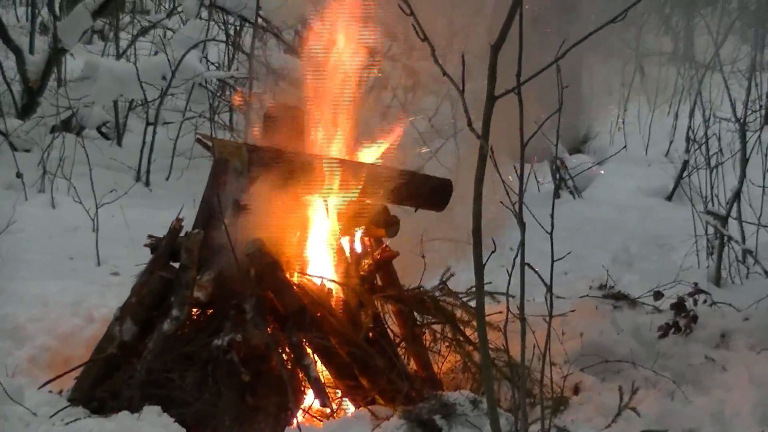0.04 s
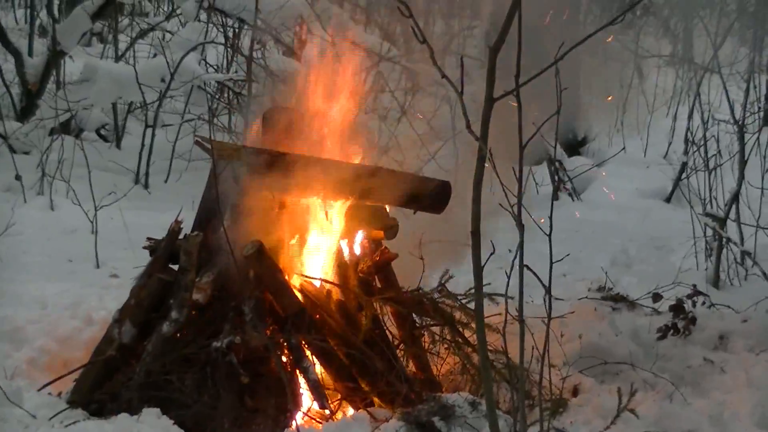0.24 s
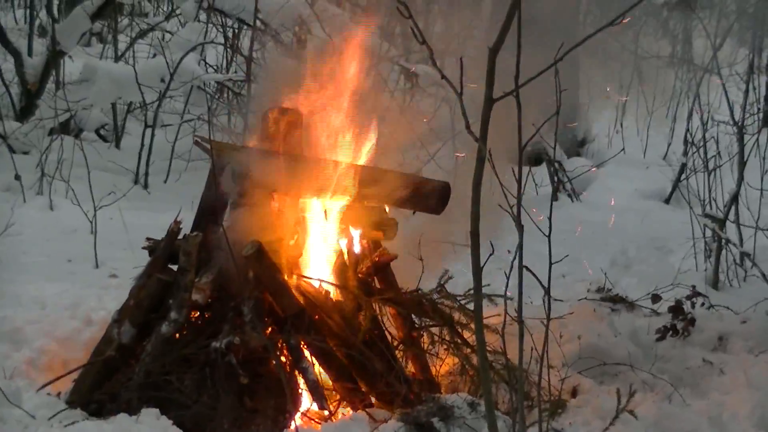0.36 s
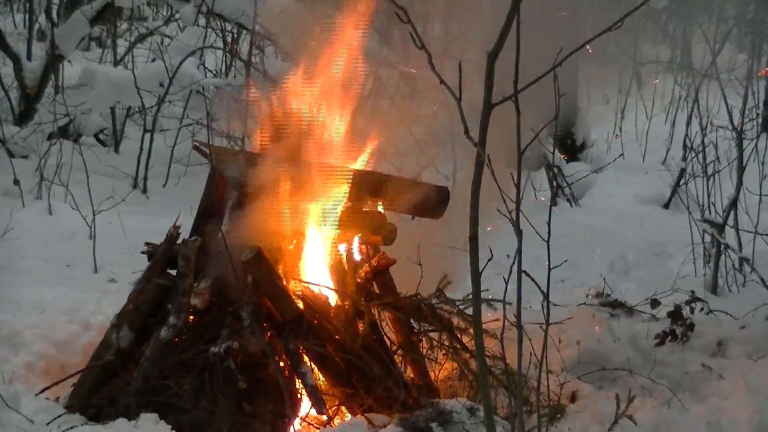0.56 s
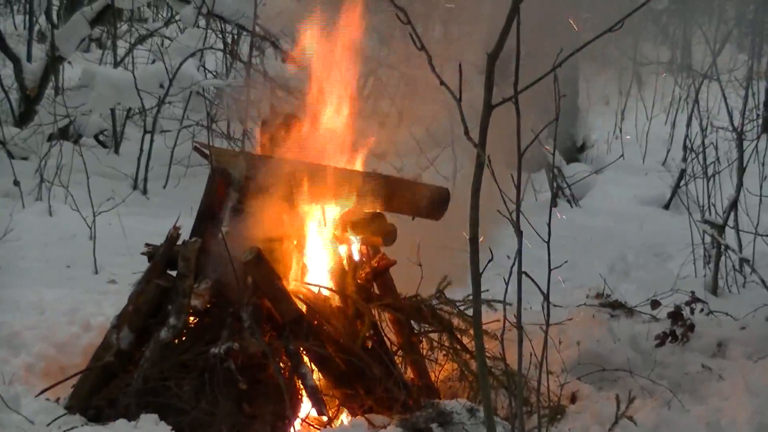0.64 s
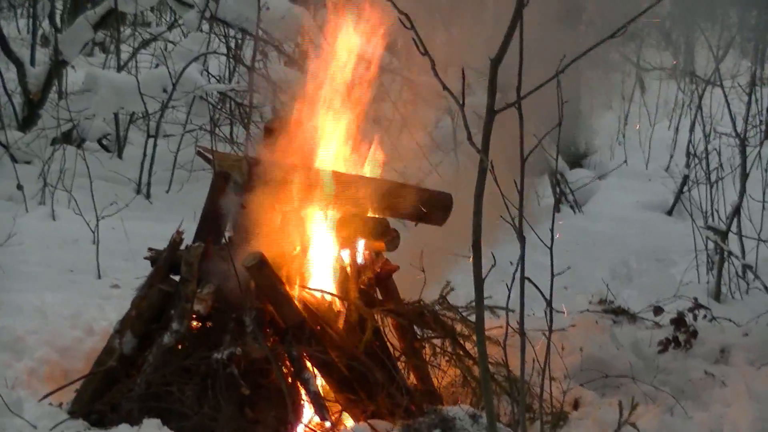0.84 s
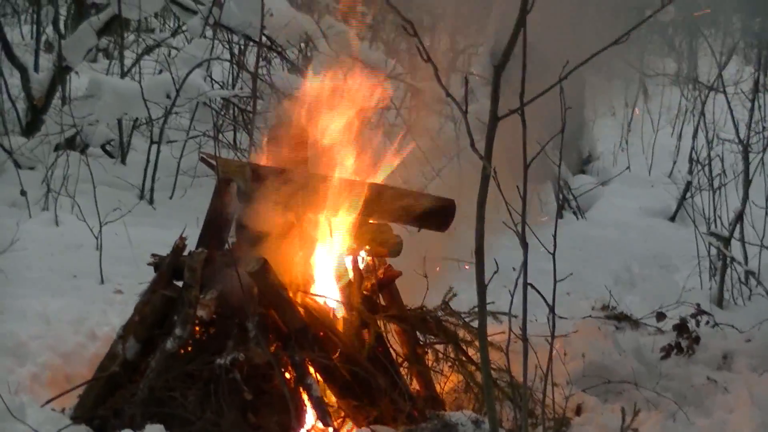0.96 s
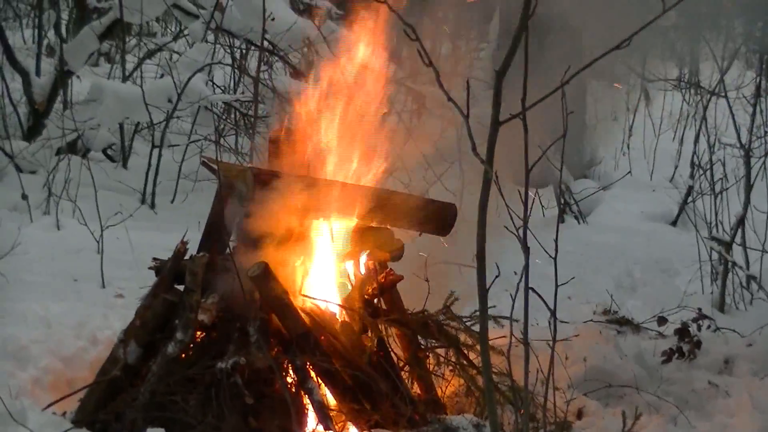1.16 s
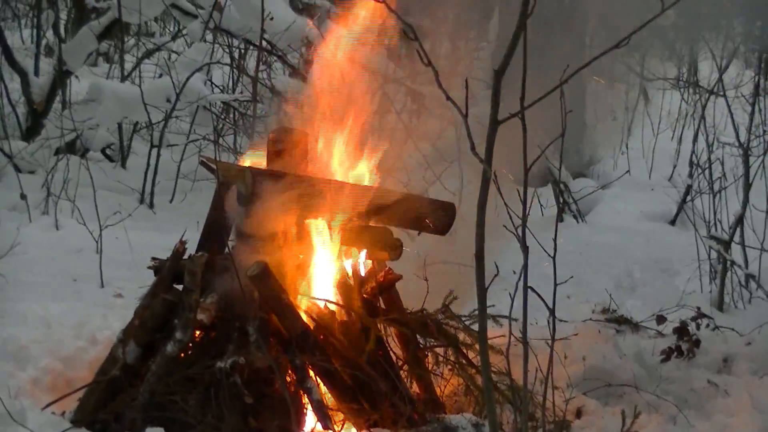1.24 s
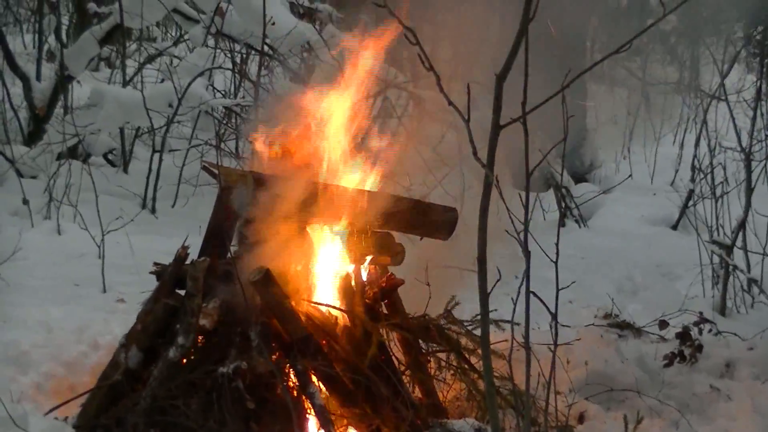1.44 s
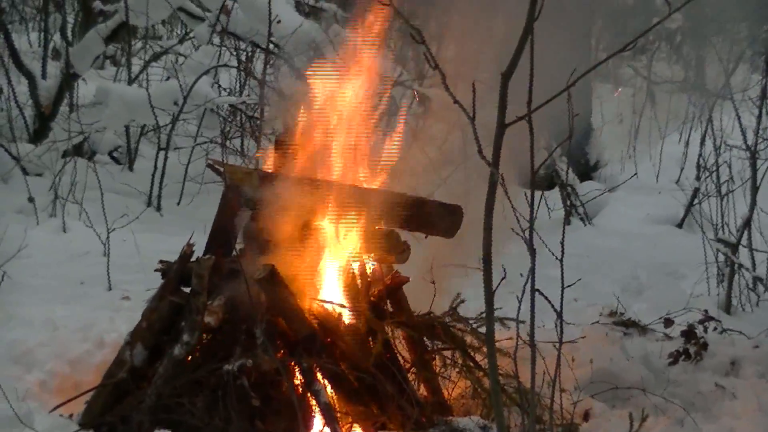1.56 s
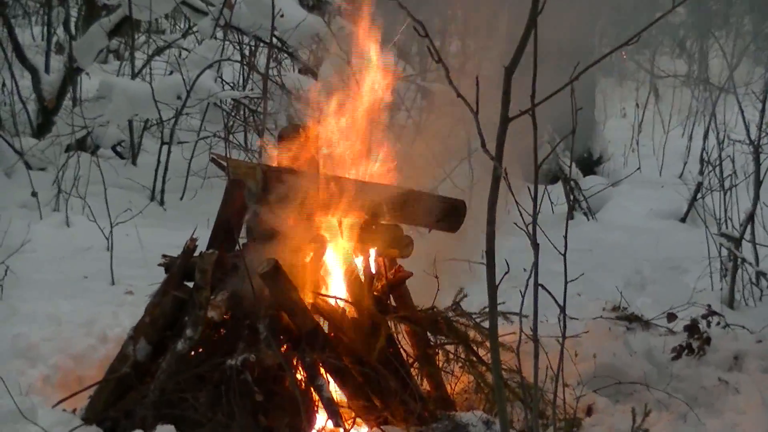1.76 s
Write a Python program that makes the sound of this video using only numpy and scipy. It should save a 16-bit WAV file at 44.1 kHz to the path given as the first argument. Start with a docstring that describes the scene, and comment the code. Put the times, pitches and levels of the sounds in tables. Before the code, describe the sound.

A wood fire crackles with sharp pops over soft hiss, a dull far-off bang rolling behind

```python
"""Campfire in a snowy forest

A fire a few metres away: fluttering low noise is the flames, flickering high noise the steam hiss.
Random clicks ring the wood as ticks. Each pop is a crack and a burst of splintering through wood
resonances, scattered back by logs and trees. Early on a dull far-off bang arrives by several paths and
rolls on as decaying noise for over a second; faint two-note sine pips, perhaps a bird, come from afar."""
import sys
import numpy as np
from scipy import signal
from scipy.fft import rfft, irfft
from scipy.io import wavfile
from scipy.ndimage import uniform_filter1d

SR = 44100
rng = np.random.default_rng(int(sys.argv[2]) if len(sys.argv) > 2 else 0)


def inscribe(sig):
    """Save sig as 16-bit PCM at rate SR to the path in sys.argv[1].

    A 1-D sig is mono; a 2-D sig holds one channel per row.
    Samples are clipped to [-1, 1] before scaling.
    """
    pcm = np.round(np.clip(np.atleast_2d(sig).T, -1, 1) * 32767)
    wavfile.write(sys.argv[1], SR, pcm.astype(np.int16))


N = 79380


def undb(db):
    """Decibels to gain."""
    return 10 ** (np.asarray(db) / 20)


def unit(x):
    """Scale to rms 1."""
    return x / np.sqrt(np.mean(x ** 2))


def curve(hz, points):
    """Gain at each frequency from (f/Hz, level/dB) points, interpolated over log f."""
    f, db = np.array(points, float).T
    return undb(np.interp(np.log(np.maximum(hz, 1)), np.log(f), db))


def noise(points):
    """Two unrelated noises with the given spectrum."""
    hz = np.fft.rfftfreq(N, 1 / SR)
    spectrum = rfft(rng.standard_normal((2, N))) * curve(hz, points)
    return unit(irfft(spectrum, N))


def walk(rate_hz):
    """Slow random modulation of about unit spread, mostly below rate_hz."""
    return unit(noise([(1, 0), (rate_hz, 0), (rate_hz * 2, -20), (rate_hz * 10, -80)])[0])


def stereo(pair, side_db, pan_db=0):
    """Left and right from a centre signal and a diffuse one in antiphase; positive pan is left."""
    centre = pair[0] * undb(np.array([[pan_db], [-pan_db]]) / 2)
    side = undb(side_db) * pair[1] * np.array([[1], [-1]])
    return centre + side


def causal(gain):
    """Minimum-phase impulse response with these gains, by folding the cepstrum."""
    cepstrum = irfft(np.log(gain + 1e-5))
    half = len(cepstrum) // 2
    cepstrum[1:half] *= 2
    cepstrum[half + 1:] = 0
    return irfft(np.exp(rfft(cepstrum)))


def strike(push, ring):
    """Excite a resonance with a push; the energy is that of 1 ms at rms 1."""
    out = signal.fftconvolve(push, ring[None], axes=1)
    return out * np.sqrt(SR / 1000) / np.linalg.norm(out, axis=1, keepdims=True)


def add(out, s, sound):
    """Mix a sound in at time s."""
    start = max(int(s * SR), 0)
    out[:, start:start + sound.shape[1]] += sound


# faint far pips: t/s, f/Hz, peak level/dB
FAR_PIPS = [(.172, 4030, -58), (.345, 3190, -58.5), (.490, 3200, -59.5), (.535, 3980, -59),
            (.612, 4030, -60), (.782, 3250, -60), (.888, 4010, -63), (.937, 3230, -61), (.972, 4090, -60),
            (1.022, 3200, -62), (1.050, 4100, -67)]
PIP_HALF_LENGTH_S, PIP_WAVER_HZ = 0.0077, 74.4  # half-length to 1/e


def pips():
    """Short sines with Gaussian envelopes and wavering pitch, on two notes."""
    t = np.arange(N) / SR
    waver_hz = PIP_WAVER_HZ * walk(150)
    out = np.zeros(N)
    for s, hz, db in FAR_PIPS:
        envelope = np.exp(-((t - s) / PIP_HALF_LENGTH_S) ** 2)
        phase = 2 * np.pi * np.cumsum(hz + waver_hz) / SR
        out += undb(db) * envelope * np.sin(phase)
    return out


BANG_S, BANG_PAN_DB, BANG_SIDE_DB = .198, 2.5, -13

# colour of the rolling echo: f/Hz, level/dB
ROLL_COLOUR = [(70, -28), (150, -14.5), (240, -3), (350, 1), (520, -0.5), (750, -5.5), (1000, -10.5),
               (1400, -21), (2200, -30.5), (5000, -69)]
ROLL_DB, ROLL_ATTACK_S, ROLL_FALL_DB_PER_S, ROLL_LUMPS_DB = -42, 0.051, 12.5, 0.66


def rolling_echo():
    """Bang's echo through the trees: dull noise, lumpy in level, falling at a steady dB rate."""
    age_s = np.maximum(np.arange(N) / SR - BANG_S, 0)
    attack = np.minimum(age_s / ROLL_ATTACK_S, 1)
    level_db = ROLL_DB - ROLL_FALL_DB_PER_S * age_s + ROLL_LUMPS_DB * walk(18)
    return stereo(attack * undb(level_db) * noise(ROLL_COLOUR), BANG_SIDE_DB, BANG_PAN_DB)


# colour of the far-off bang: f/Hz, level/dB
BANG_COLOUR = [(60, -47), (100, -18), (150, -9.5), (320, -1), (480, -3.5), (660, 4), (900, -11.5),
               (1100, -15.5), (1750, -22), (2400, -35), (5000, -60), (9000, -85)]
# bang arrivals by different paths through the forest: t/s, level over 1 ms/dB
BANG_ARRIVALS = [(.2020, -29.5), (.2036, -26), (.2085, -29.5), (.2152, -28), (.2228, -27.5), (.2300, -30),
                 (.2500, -32), (.2860, -36.5), (1.114, -43)]
SMEAR_ATTACK_S, SMEAR_HOLD_S, SMEAR_DECAY_S, SMEAR_DB = 0.0011, 0.014, .026, -36


def far_bang(size=2048):
    """A dull pulse arrives by several paths inside a smear of scattered noise."""
    pulse = strike(np.ones((1, 1)), causal(curve(np.fft.rfftfreq(size, 1 / SR), BANG_COLOUR)))
    paths = np.zeros((2, N + SR))
    for s, db in BANG_ARRIVALS:
        add(paths, s, undb(db) * pulse * np.array([[1], [0]]))  # centre only
    age_s = np.maximum(np.arange(N) / SR - BANG_S, 0)
    attack = np.minimum(age_s / SMEAR_ATTACK_S, 1)
    decay = np.exp(-np.maximum(age_s - SMEAR_ATTACK_S - SMEAR_HOLD_S, 0) / SMEAR_DECAY_S)
    smear = undb(SMEAR_DB) * attack * decay * noise(BANG_COLOUR)
    return stereo(paths[:, :N] + smear, BANG_SIDE_DB, BANG_PAN_DB)


# flame rumble spectrum: f/Hz, level/dB
FLAME_COLOUR = [(20, -21), (40, -7), (75, 0.5), (130, -1.5), (230, -.5), (420, -1), (700, -3.5), (1050, -8),
                (1600, -17), (3000, -39)]
FLAME_DB, FLAME_FLUTTER_DB, FLAME_SIDE_DB, FLAME_PAN_DB = -54.5, 0.37, -4.5, 3.5


def flame_rumble():
    """Flames: low noise with a slow flutter in level."""
    level_db = FLAME_DB + FLAME_FLUTTER_DB * walk(4.7)
    return stereo(noise(FLAME_COLOUR), FLAME_SIDE_DB, FLAME_PAN_DB) * undb(level_db)


# steam hiss spectrum: f/Hz, level/dB
HISS_COLOUR = [(700, -36), (1200, 7), (1800, 11.5), (2400, 4.5), (3300, 8), (4300, 1.5), (5600, 2),
               (6800, 1), (7300, -1), (8200, 2), (10000, -1), (11500, -4), (16000, -12.5)]
HISS_DB, HISS_FLICKER_DB, HISS_SIDE_DB = -62, 2, -1.5


def steam_hiss():
    """Steam: wide high noise with a fast flicker in level."""
    level_db = HISS_DB + HISS_FLICKER_DB * walk(67)
    return stereo(noise(HISS_COLOUR), HISS_SIDE_DB) * undb(level_db)


# resonances of the burning wood: f/Hz, width/Hz, level/dB
WOOD_MODES = [(1730, 720, 4.5), (2115, 120, 1.5), (3300, 1530, -5.5), (4420, 3000, -2), (6690, 780, -1.5),
              (8000, 1060, -0.5), (9450, 2370, -0.5), (12300, 1200, -17.5), (14300, 2500, -23)]
RING_WIDTH_HZ, RING_DB, WOOD_LOW_CUT_HZ = 720, 5, 860


def wood(knock_db, snap_db, air_db, ring_hz, size=1024):
    """Short ring of the wood, coloured for one crack; too small to radiate bass."""
    hz = np.fft.rfftfreq(size, 1 / SR)
    modes = WOOD_MODES + [(ring_hz, RING_WIDTH_HZ, RING_DB)]
    power = sum((undb(db) / (1 + (2 * (hz - f) / width) ** 2)) ** 2 for f, width, db in modes)
    tilt = curve(hz, [(2000, knock_db), (3000, 0), (4500, 0),
                      (7500, snap_db), (9500, snap_db), (11500, air_db)])
    low_cut = hz ** 2 / np.hypot(hz ** 2, WOOD_LOW_CUT_HZ ** 2)
    return causal(np.sqrt(power) * tilt * low_cut)


# tick colour before brightness: knock/dB, snap/dB, air/dB
TICK_TILT_DB = (-3.5, 6, 7.5)
# splinter ring of the dull, middle and bright ticks: f/Hz
TICK_RINGS_HZ = (2970, 3150, 3930)
TICKS_PER_S, TICK_SPREAD_DB, TICK_DB, TICK_SIDE_DB = 260, 1.5, -69.5, -18


def ticks():
    """Tiny cracks at random times ring the wood, some duller and some brighter."""
    out = 0
    for brightness_db, ring_hz in zip((-6, 0, 5), TICK_RINGS_HZ):
        chance = rng.random((3, N))
        sizes = undb(TICK_SPREAD_DB * np.minimum(-np.log(chance[1]), 4))
        clicks = (chance[0] < TICKS_PER_S / 3 / SR) * sizes
        side_clicks = clicks * unit(chance[2] - .5)
        colour_db = np.array(TICK_TILT_DB) + brightness_db * np.array([-.5, 1, 1])
        ring = unit(wood(*colour_db, ring_hz))
        out = out + signal.fftconvolve([clicks, side_clicks], ring[None], axes=1)[:, :N]
    return undb(TICK_DB) * stereo(unit(out), TICK_SIDE_DB)


SPLINTER_SHARE = 2  # splintering rms sum against the crack, for 1 ms of splintering


def tear(splinter_ms, size=1024):
    """One crack, then fibres part in a fast dying cluster; centre spectrum evened out."""
    age = np.arange(size) / SR * 1000 / max(splinter_ms, .1)  # in splintering times
    grain = rng.standard_normal((2, size))
    push = grain * abs(grain) * np.exp(-age) * (1 - np.exp(-2 * age))
    push = push / np.linalg.norm(push, axis=1, keepdims=True) * SPLINTER_SHARE * np.sqrt(splinter_ms)
    push[0, 0] += 1  # the crack
    power = uniform_filter1d(abs(rfft(push[0])) ** 2, size=9)
    push[0] = signal.fftconvolve(push[0], causal(power ** -.5))[:size]
    return push


SCATTER_DECAY_S, SCATTER_SIDE_DB, SCATTER_TREBLE_DB = 0.021, -5, -0.5


def scatter(size=6144):
    """Dense early echoes from logs and trees: spiky noise, fast onset, exponential decay."""
    t = np.arange(size) / SR
    grain = rng.standard_normal((2, size))
    return grain * abs(grain) * np.exp(-t / SCATTER_DECAY_S) * (1 - np.exp(-t / .0007))


POP_SIDE_DB = -14
# pops: t/s, level over 1 ms/dB, splintering/ms, knock below 2 kHz/dB, snap near 8 kHz/dB,
# air above 11.5 kHz/dB, scatter re crack/dB, splinter ring f/Hz
STEAM_POPS = [(.0028, -44.5, 1.6, 14, 11.5, 22, -4, 3470), (.0570, -48, 1, -1, -2, 5, 0, 3840),
              (0.082, -44, 0.46, 0.5, 0, 10, -4, 3360), (0.2429, -51.5, 0.46, -8, 11, 6, -10, 4200),
              (.3012, -38.5, 0.26, -5, -17, -7, -13, 3220), (0.397, -55, 0.55, -6, 3, 8, 5.5, 3000),
              (0.4776, -50.5, 0.7, -18, -1, 2, -13, 4530), (.4870, -52, 0.58, 2, 10, 4, -5, 3200),
              (0.571, -48.5, 0.48, 6, 5, 7, 0, 3620), (.6595, -39.5, 0.69, -14, -5.5, 10, -17, 3260),
              (0.6928, -44.5, .6, 3, 2, 5, -25, 4050), (0.7153, -31.5, 1.3, 2, 2.5, 9, -5, 3000),
              (0.8214, -47.5, 1.1, -1, -2, 2, -16, 2080), (.8693, -45, 0.37, 3, 2, -3, -5, 3140),
              (0.8734, -43, 0.57, 2.5, 4, 5, -8, 3480), (1.0597, -46.5, .9, 2, -4, 7, -2, 1550),
              (1.0840, -35, 0.98, -4, -5, 9.5, -9.5, 3200), (1.109, -50.5, 0.34, -8, 12, 8, -4, 3800),
              (1.1574, -48.5, 0.45, 0.5, -9, -2, -20, 2080), (1.3, -42, 0.7, 8, -6, -8, -6, 1210),
              (1.3004, -30.5, 1.6, 0.5, 1, 0, -16, 3220), (1.3163, -44.5, 1.1, -2, -23, -6, -6, 2890),
              (1.3222, -36, 1.9, -3, 3, 9, -39, 4300), (1.3525, -18.5, 0.37, 1, 3, -4.5, -18.5, 3620),
              (1.3691, -41, .6, -8, -19, -11, -5, 2820), (1.5037, -45, .9, 0, -15, -11, -4.5, 2860),
              (1.5372, -40, 0.71, -2, 0, 8, -13, 3700), (1.6562, -57, 0.53, -10, -7, -6, -3, 3430),
              (1.6960, -52, 0.7, -12, 5, -13, -5, 3300), (1.7839, -49.5, .9, -13, 6, -2, -10, 4050)]


def pops():
    """Steam pockets burst in the logs; each crack rings the wood and is scattered back."""
    out = np.zeros((2, N + SR))
    for s, db, splinter_ms, knock_db, snap_db, air_db, scatter_db, ring_hz in STEAM_POPS:
        crack = strike(tear(splinter_ms), wood(knock_db, snap_db, air_db, ring_hz))
        echo_ring = wood(knock_db, snap_db + SCATTER_TREBLE_DB, air_db + SCATTER_TREBLE_DB, ring_hz)
        echoes = strike(scatter(), echo_ring)
        add(out, s, undb(db) * stereo(crack, POP_SIDE_DB))
        add(out, s, undb(db + scatter_db) * stereo(echoes, SCATTER_SIDE_DB))
    return out[:, :N]


def scene():
    """The forest around, the fire in front."""
    forest = pips() + rolling_echo() + far_bang()
    fire = flame_rumble() + steam_hiss() + ticks() + pops()
    return forest + fire


TOP_HZ = 16000


def record(dry):
    """Steep elliptic low-pass at TOP_HZ."""
    return signal.sosfilt(signal.ellip(8, .2, 70, TOP_HZ, fs=SR, output="sos"), dry)


dry = scene()
out = record(dry)
inscribe(out)
```